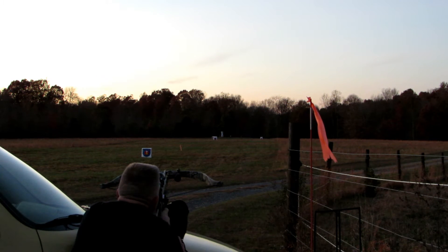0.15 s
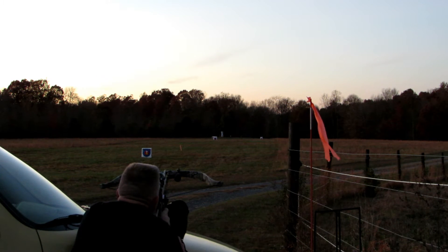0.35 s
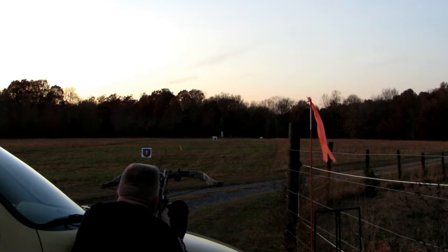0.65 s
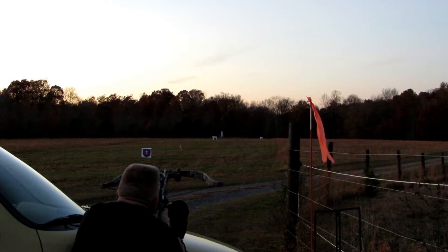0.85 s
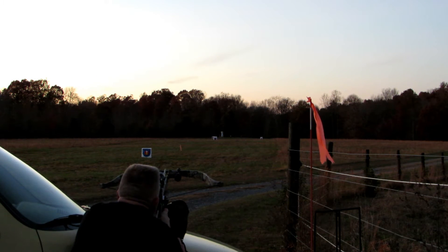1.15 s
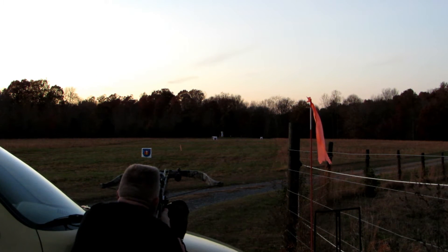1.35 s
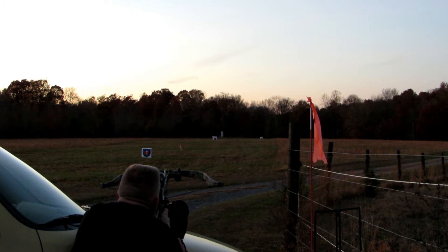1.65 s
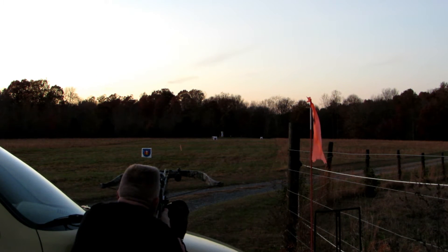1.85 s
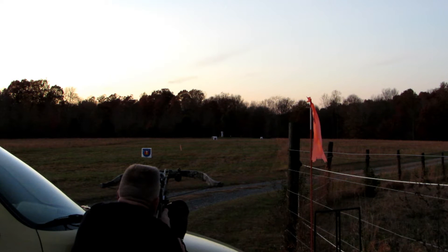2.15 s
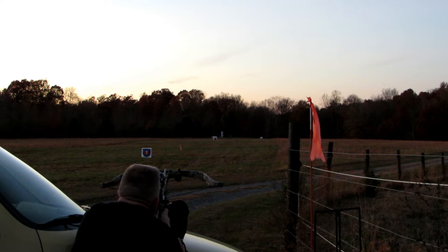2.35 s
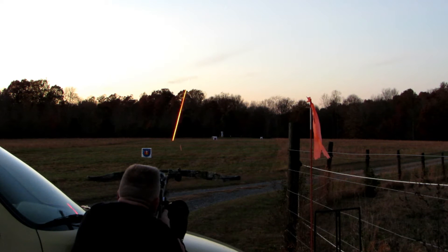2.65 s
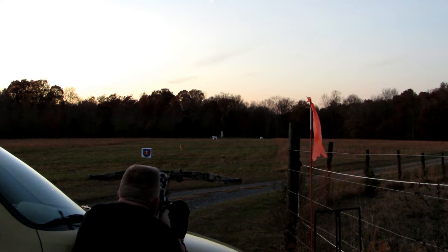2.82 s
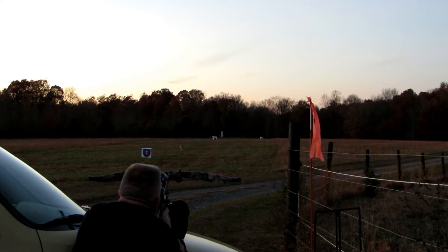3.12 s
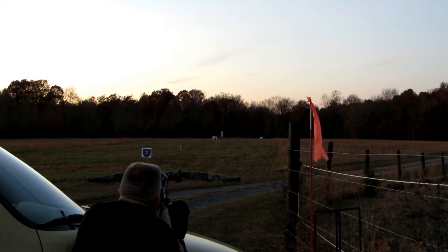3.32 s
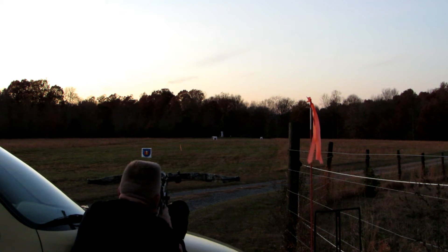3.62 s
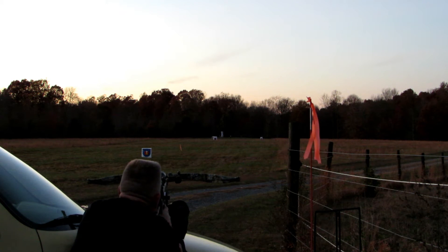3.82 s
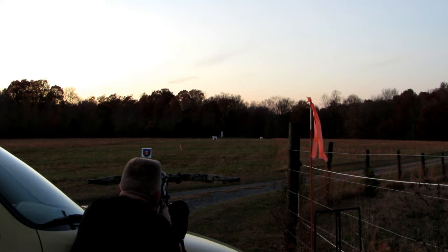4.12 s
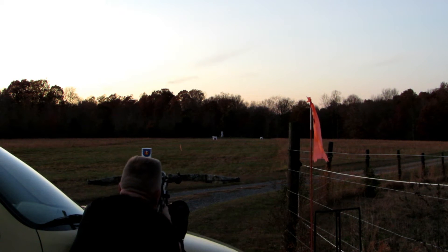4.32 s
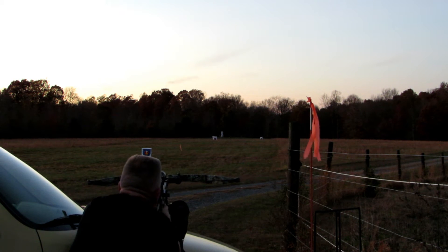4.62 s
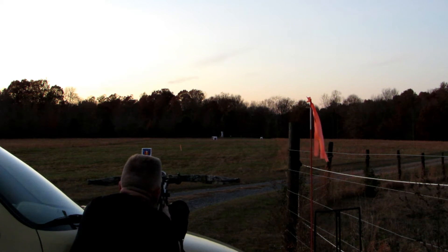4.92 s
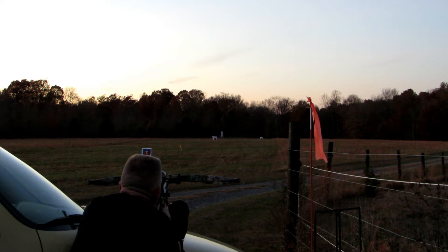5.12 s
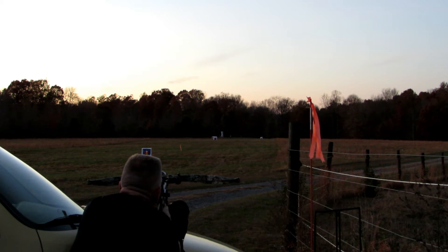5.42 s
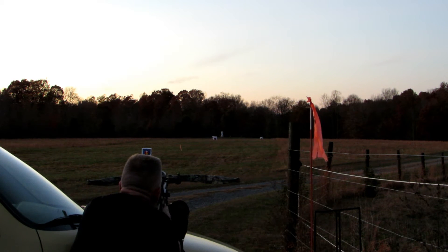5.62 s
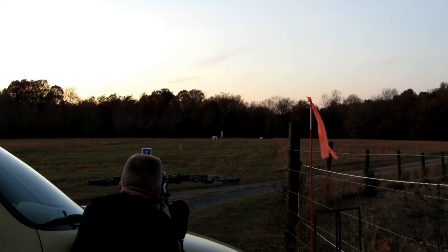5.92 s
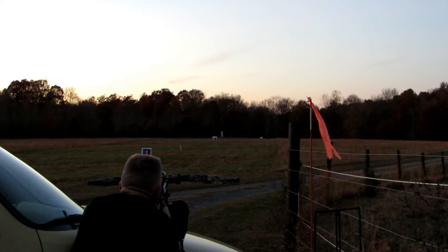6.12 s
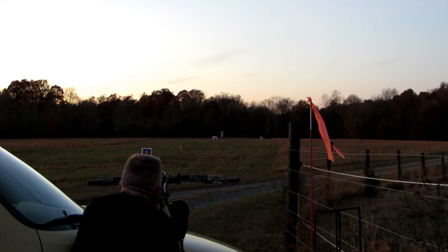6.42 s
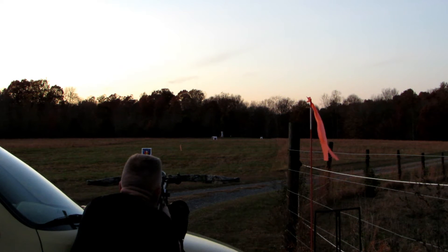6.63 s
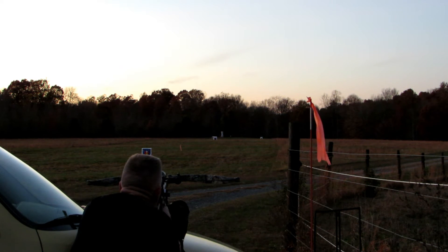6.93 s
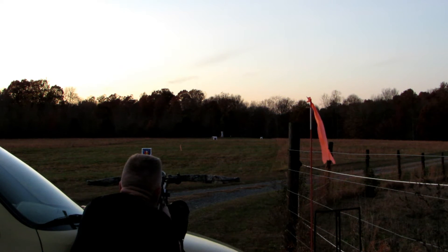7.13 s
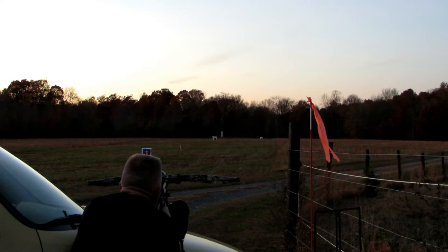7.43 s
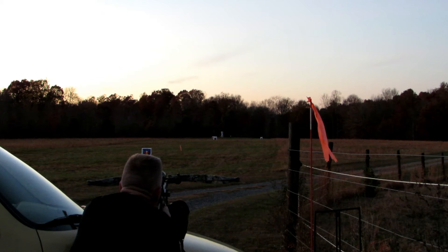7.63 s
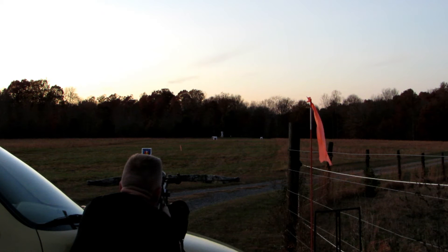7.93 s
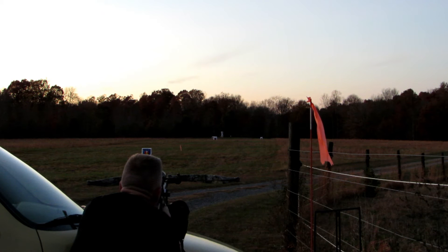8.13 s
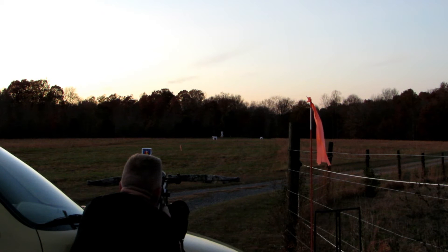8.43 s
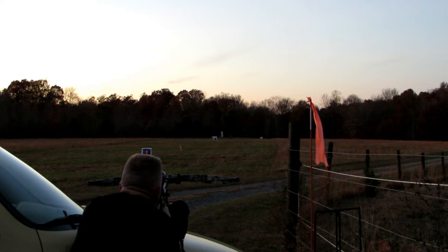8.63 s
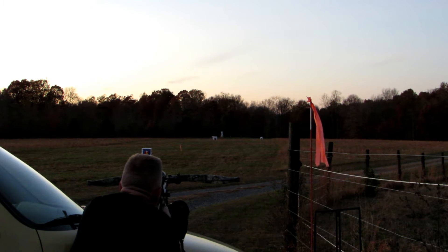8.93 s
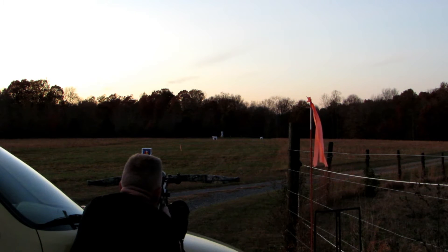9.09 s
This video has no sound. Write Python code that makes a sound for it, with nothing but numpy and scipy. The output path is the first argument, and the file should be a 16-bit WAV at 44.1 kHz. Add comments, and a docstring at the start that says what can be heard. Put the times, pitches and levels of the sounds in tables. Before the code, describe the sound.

A small camera microphone hears a quiet open field with distant traffic and steady hiss. Two soft, far gunshots roll through the trees. A few steps away, a crossbow snaps very loudly, clacking and briefly ringing. The automatic level ducks, then creeps back up. Four more distant shots with long woodland echoes follow, then one dry, dull tick across the field.

```python
"""At the edge of a field, traffic noise, light air and a camera's hiss and thin rising whine are heard throughout.
A vehicle soon passes far off, then a distant gun fires twice, each report rolling back from the woods as echoes.
A crossbow is shot a few steps away: noise bursts clack and rattle, decaying tones ring, and grass and fence
scatter the snap. The camera's gain control ducks at the snap and slowly recovers.
The gun fires four more times, and at the end one dull knock comes from across the field."""
import sys
import numpy as np
from scipy import signal
from scipy.fft import rfft, irfft
from scipy.io import wavfile
from scipy.ndimage import uniform_filter1d, minimum_filter1d

SR = 44100
rng = np.random.default_rng(int(sys.argv[2]) if len(sys.argv) > 2 else 0)


def wav_record(signal):
    """Record a signal, one row per channel, as 16-bit PCM in the file named by sys.argv[1]."""
    frames = np.transpose(np.atleast_2d(signal))
    bounded = np.clip(frames, -1, 1)
    # unit amplitude maps onto the largest positive 16-bit level
    quanta = np.round(bounded * 32767).astype(np.int16)
    wavfile.write(sys.argv[1], SR, quanta)


N = 408366
TIME = np.arange(N) / SR

# Banks and stands of trees: the front of each gives a hard echo, its depth gives scatter.
# Each row: delay in seconds, hard echo in dB, scatter in dB, scatter decay in seconds (levels are relative).
STANDS = [(.005, -10, 5.5, .012), (.026, -9, 2, 0.021), (.072, -17, -3, 0.035), (.106, -5, 0, 0.12),
          (.126, -4, 1.5, 0.019), (.176, -7.5, 0, .04), (.219, -10, 0.5, .075), (.262, -9, 0, 0.11)]
FOREST_DELAY_S = 0.11  # the deep woods answer from the tree line on
RAGGED_EDGE_S = 0.0019  # ragged edges make scatter take a moment to build up


def undb(db):
    """Turn decibels into a gain."""
    return 10 ** (np.asarray(db) / 20)


def die_away(t, t60):
    """Fade that falls by 60 dB in t60 seconds."""
    return np.exp(-np.log(1000) * t / t60)


def click(points):
    """The sharpest pulse, with nothing before its start, that has the tone colour of (Hz, dB) points; unit energy."""
    size = 4096
    hz, db = np.transpose(points)
    bin_hz = np.arange(size // 2 + 1) * SR / size
    log_gain = np.log(undb(np.interp(np.log(bin_hz + 1), np.log(hz), db)))
    # keeping only the forward half of the cepstrum packs the energy at the start (minimum phase)
    cepstrum = irfft(log_gain)[:size // 2]
    cepstrum[0] = 0
    pulse = irfft(np.exp(rfft(2 * cepstrum, size)))
    return pulse / np.linalg.norm(pulse)


def through(x, response):
    """Pass a sound through an impulse response (convolution)."""
    return signal.fftconvolve(np.atleast_2d(x), np.atleast_2d(response), axes=1)[:, :N]


def noise(side_db, size=N):
    """Stereo white noise whose side part (left against right) is side_db relative to the middle."""
    middle, side = rng.standard_normal((2, size))
    side = side * undb(side_db)
    return np.array([middle + side, middle - side]) / np.sqrt(1 + undb(side_db) ** 2)


def add(out, s, x):
    """Mix x into out from s seconds on."""
    start = int(s * SR)
    x = x[..., :N - start]
    out[:, start:start + x.shape[-1]] += x


def pan(db):
    """Gains of the two channels that make the left db louder than the right."""
    return undb(np.array([[db], [-db]]) / 2)


def tail(delay, decay):
    """Power of scatter that starts after delay; its amplitude builds up, then dies with time constant decay."""
    age = np.maximum(TIME - delay, 0)
    build_up = 1 - np.exp(-age / RAGGED_EDGE_S)
    return (build_up * np.exp(-age / decay)) ** 2


def camera(middle_db=-55.0, side_db=-48.0, whine_db=-71):
    """Wide microphone hiss from shaped noise, and a thin, slightly unsteady whine that slowly rises."""
    # Hiss of the stereo microphone, with a strong side part in the bass.
    # Each row: frequency in Hz, colour of the middle in dB, colour of the side in dB.
    hiss_colour = [(20, -3, 10.5), (120.3, -2.5, 13), (450, -0.5, 17.5), (900, 5, 15), (1800, 3, 8),
                   (3330, 0.5, 3.5), (5000, -1.5, -0.5), (7600, -3, -1.5), (8200, -5.5, -4),
                   (11100, -8.5, -8.5), (13200, -13, -13.5), (14300, -22, -19.5), (15000, -53, -46)]
    hz, middle_shape, side_shape = np.transpose(hiss_colour)
    middle = undb(middle_db) * through(rng.standard_normal(N), click(np.c_[hz, middle_shape]))
    side = undb(side_db) * through(rng.standard_normal(N), click(np.c_[hz, side_shape]))
    hiss = np.vstack([middle + side, middle - side])

    whine_hz, rise_hz_per_s = 5710, 28.2
    jitter = 300 * uniform_filter1d(rng.standard_normal(N), size=400)  # about 15 Hz either way
    pitch = whine_hz + rise_hz_per_s * TIME + jitter
    whine = np.sqrt(2) * np.sin(2 * np.pi * np.cumsum(pitch) / SR)
    return hiss + undb(whine_db) * whine


def road(traffic_db=-52.0, swell_db=1, side_db=-9):
    """Distant traffic as shaped noise whose level swells gently at random."""
    # Each row: frequency in Hz, colour of the traffic in dB.
    traffic_colour = [(20, -16), (85, -3), (150, -10.5), (260, -19), (400, -2.5), (530, 3), (660, 0.5),
                      (950, -3.5), (1500, -18), (3000, -41)]
    swell = np.interp(TIME, np.linspace(0, TIME[-1], 30), rng.standard_normal(30))
    return through(noise(side_db), click(traffic_colour)) * undb(traffic_db + swell_db * swell)


def tyres(level_db=-55, pass_s=0.34, pass_length_s=0.16, pass_db=3.5, side_db=-9):
    """Noise through resonances makes tyres sing steadily, and louder while one vehicle goes by."""
    # Each row: frequency in Hz, width in Hz, relative level in dB.
    tyre_tones = [(538, 29, 0.5), (620, 20, -12.5), (754, 15, -4.5)]
    t = TIME[:SR // 4]
    tread = np.zeros(len(t))
    for hz, width, db in tyre_tones:
        fade = np.exp(-np.pi * width * t)
        tread += undb(db) * np.sqrt(width) * fade * np.sin(2 * np.pi * hz * t)
    passing = np.exp(-((TIME - pass_s) / pass_length_s) ** 2)
    singing = through(noise(side_db), tread / np.linalg.norm(tread))
    return singing * undb(level_db + pass_db * passing)


def light_air(level_db=-66):
    """Low noise, mostly different on the two microphone ports, rumbles as air moves over them."""
    return undb(level_db) * through(noise(side_db=5.0), click([(20, -2.5), (80, 3), (200, -13.5), (1000, -49.5)]))


def background():
    """The far road, a little to the right, and light air at the microphone."""
    return (road() + tyres()) * pan(db=-1.5) + light_air()


def far_knock(at_s=8.0662, level_db=-9.5):
    """One dry, dull tick from across the field, a single shaped pulse."""
    # Each row: frequency in Hz, colour of the knock in dB.
    knock_colour = [(30, -26), (130, -6), (260, -21), (800, 4.5), (1400, -11), (2100, 1), (2450, -12),
                    (2900, -38), (8000, -59)]
    out = np.zeros((2, N))
    add(out, at_s, undb(level_db) * click(knock_colour))
    return out


def woods_strength(forest_db=-4, forest_t60_s=5.24):
    """How strongly the land answers at each delay: scatter of the stands on top of the forest's long roll."""
    power = undb(forest_db) ** 2 * tail(FOREST_DELAY_S, forest_t60_s / np.log(1000))
    for delay, _, scatter_db, decay in STANDS:
        power = power + undb(scatter_db) ** 2 * tail(delay, decay)
    return np.sqrt(power)


def woods_echoes(count, echo_db=-32.0, slap_db=-3, flutter_db=1, patchy_db=1.6, dulling_s=.7, stirred=0.57,
                 side_db=-16, trunks_per_s=60, trunk_db=19):
    """One rolling echo for each shot: countless trunks answer, duller the further the sound has travelled."""
    # Each row: frequency in Hz, colour of early echoes in dB, colour of late echoes in dB.
    woods_colour = [(30, -25, -37), (110, -17.5, -21.5), (230, -25.5, -33.5), (364, -11, -18.5),
                    (680, -2.5, 2.5), (1014, 2, 5), (1436, -4, -9.5), (1950, -14.5, -27.5),
                    (3250, -25.5, -40), (4240, -37.5, -58.5), (9000, -74, -76.5)]
    hz, early_db, late_db = np.transpose(woods_colour)
    early, late = click(np.c_[hz, early_db]), click(np.c_[hz, late_db])
    size = SR * 7 // 2
    t = TIME[:size]
    near_share = np.exp(-t / dulling_s)

    # clumps of trees answer unevenly, and alike for every shot
    clumps = np.interp(t, np.arange(size // 256) * 256 / SR, rng.standard_normal(size // 256))
    strength = woods_strength()[:size] * undb(patchy_db * clumps + echo_db)
    # single thick trunks stand out of the scatter, mostly the near ones
    trunk_here = (t > FOREST_DELAY_S) * (rng.random(size) < trunks_per_s / SR)
    thick = undb(trunk_db) * near_share * trunk_here

    still = noise(side_db, size=size)
    echoes = []
    for _ in range(count):
        # moving air changes a share of the paths from shot to shot
        changed = noise(side_db, size=size)
        paths = np.sqrt(1 - stirred) * still + np.sqrt(stirred) * changed
        trunks = (paths + thick) * strength
        echo = through(trunks * near_share, early) + through(trunks * (1 - near_share), late)
        for delay, hard_db, _, _ in STANDS:
            flutter = flutter_db * rng.standard_normal()
            add(echo, delay, undb(slap_db + hard_db + flutter) * early)
        echoes.append(echo)
    return echoes


def gunshots(report_db=-2, ground_lag=0.00076, ground_db=1, thump_db=-9, thump_lag=0.0019, edge_lag=.0685,
             pan_db=-1.5):
    """Each shot is a crack, its bounce off the ground and a low thump; field edge and woods answer."""
    # Each row: start in seconds, report in dB, rolling echo in dB, hard echo from the field edge in dB.
    # The report and rolling echo levels are relative; report_db, thump_db and echo_db are added to them.
    shots = [(0.7147, -2.5, -1, -13.5), (1.4784, -3, -1, -16), (3.0513, -2, -1.5, -8.5),
             (4.4140, -3, -2, -13.5), (6.2252, -3, -1, -14), (7.25, -4, -0.5, -5)]
    # Colours of the crack, the thump and the field edge's echo. Each row: frequency in Hz, level in dB.
    report_colour = [(30, -38), (200, -14.5), (520, -0.5), (800, 8.5), (1100, 1.5), (1600, 3.5), (2000, -5),
                     (2700, -13.5), (3400, -11), (4100, -41), (9000, -67)]
    thump_colour = [(20, -15), (50, -3.5), (90, 5), (150, -2), (240, -40), (700, -54)]
    edge_colour = [(100, -37), (950, -18), (1350, 10), (1750, -20), (2800, -10.5), (4000, -55), (9000, -72)]
    crack = click(report_colour)
    thump = click(thump_colour)
    edge_echo = click(edge_colour)

    out = np.zeros((2, N))
    for (s, db, woods_db, edge_db), echo in zip(shots, woods_echoes(count=len(shots))):
        add(out, s, undb(db + report_db) * crack)
        add(out, s + ground_lag, undb(db + report_db + ground_db) * crack)
        add(out, s + thump_lag, undb(db + thump_db) * thump)
        add(out, s + edge_lag, undb(edge_db) * edge_echo)
        add(out, s, undb(woods_db) * echo)
    return out * pan(pan_db)


def fence_and_field(x, wet_db=-30, side_db=-5, grass_t60_s=.85, fence_delay_s=.078, fence_db=7, fence_decay_s=.026):
    """Posts, car and grass scatter a faint copy: grass at once, fading evenly, the fence a moment later."""
    # Each row: frequency in Hz, colour of the scatter in dB.
    near_colour = [(60, -10), (300, -5), (1000, -1.5), (2800, -1.5), (3250, 5.5), (3800, -2), (6000, 2),
                   (14000, -7.5)]
    grass = tail(0, grass_t60_s / np.log(1000))
    fence = undb(fence_db) ** 2 * tail(fence_delay_s, fence_decay_s)
    scatter = (noise(side_db) * np.sqrt(grass + fence))[:, :SR * 3 // 4]
    response = through(scatter / np.linalg.norm(scatter[0]), click(near_colour))
    return undb(wet_db) * through(x, response)


def clack(blows, clack_db=31, rattle_db=-6, rattle_t60=.08, side_db=-14):
    """Each blow is a short harsh burst of noise as parts touch, and a longer, softer rattle."""
    # Each row: frequency in Hz, colour of a contact in dB.
    clack_colour = [(30, -30), (200, -18), (400, -2), (680, -5), (920, -10.5), (1500, 0), (2300, 0),
                    (4300, -4), (6500, -10.5), (10000, -10.5), (12600, -6.5), (14300, -17.5)]
    t = TIME[:SR // 2]
    high_pass = signal.butter(1, 7000, "high", fs=SR, output="sos")
    contacts = np.zeros((2, N))
    for s, db, decay, treble_db in blows:
        contact = noise(side_db, size=len(t)) * np.exp(-t / decay)
        rattle = noise(side_db, size=len(t)) * die_away(t, rattle_t60)
        contact = contact / np.linalg.norm(contact[0])
        rattle = rattle / np.linalg.norm(rattle[0])
        blow = contact + undb(rattle_db) * rattle
        treble = signal.sosfilt(high_pass, blow)
        add(contacts, s, undb(db) * (blow + (undb(treble_db) - 1) * treble))
    return undb(clack_db) * through(contacts, click(clack_colour))


def limbs_and_stock(release_s, recoil_db=21, ring_db=0, swell_s=0.0047):
    """Limbs, string and rail ring as decaying tones; the stock kicks back as the limbs fly forward."""
    # Each row: frequency in Hz, level in dB, time to fade by 60 dB in seconds.
    bow_modes = [(226, -34, .5), (316, -4, .08), (409, -22, .26), (530, -9, .06), (635, -6, .1),
                 (740, -7, .07), (1262, -23, .3), (1453, -9, .1), (1570, -3, .08), (1960, -15, .15),
                 (2080, -5, .08), (2152, -13, .25), (2240, -2, .075), (2330, -2, .07), (2579, -4, .085),
                 (2750, -4, .08), (3050, -5, .09), (3257, -1, .11), (3460, -5, .08), (4150, -7, .09),
                 (4385, -4, .09), (4522, -3, .09), (5750, -10, .11), (7700, -10, .09), (8250, -12, .08),
                 (9240, -12, .09), (10920, -11, .07), (12150, -4, .06), (13000, -7, .055)]
    # Each row: frequency in Hz, colour of the kick in dB.
    recoil_colour = [(20, -16.5), (70, -7.5), (130, -4.5), (220, -9.5), (450, 2), (700, -9.5), (1500, -37),
                     (6000, -67)]
    t = TIME[:SR // 2]
    swing = np.zeros(len(t))
    for hz, db, t60 in bow_modes:
        swing += undb(db) * die_away(t, t60) * np.sin(2 * np.pi * (hz * t + rng.random()))
    # the tones take up their energy while the string runs down the rail
    build_up = 1 - np.exp(-t / swell_s)
    body = np.zeros((2, N))
    add(body, release_s, undb(ring_db) * swing * build_up)
    add(body, release_s, undb(recoil_db) * click(recoil_colour))
    return body


def crossbow():
    """The stock kicks, the parts clack and rattle, and the limbs ring from the moment of release."""
    # Latch, string stop and rebounds. Each row: start in seconds, relative level in dB,
    # contact decay in seconds, change of the treble above about 7 kHz in dB.
    blows = [(2.7393, -8, 0.0017, 5), (2.7406, 0.5, 0.0027, -5), (2.7456, -4.5, 0.00098, 1.5),
             (2.7509, -11.5, 0.0018, -1), (2.7562, -11.5, .003, -4), (2.7603, -9.5, 0.0023, -5.5),
             (2.776, -27.5, .004, -3)]
    return clack(blows) + limbs_and_stock(release_s=blows[0][0])


def scene():
    """The near snap and the far shots over the quiet field."""
    snap = crossbow()
    left, right = gunshots() + background()
    # these sounds come from a little to the right and reach the left port a sample later
    far = np.array([np.r_[0, left[:-1]], right])
    return snap + fence_and_field(snap) + far + far_knock() + camera()


def gain_control(x, limit_db=-8.5, hold_s=0.39, release_s=0.51):
    """Whatever exceeds the limit turns the gain down at once; it is held, then creeps back."""
    power = uniform_filter1d(np.mean(x ** 2, axis=0), size=SR // 125)  # averaged over 8 ms
    excess = np.maximum(10 * np.log10(np.maximum(power, 1e-12)) - limit_db, 0)
    fade = np.exp(-TIME / release_s)
    released = np.maximum.accumulate(excess / fade) * fade
    # the largest value within the hold time before each moment
    half_hold = int(hold_s * SR) // 2
    held = -minimum_filter1d(-released, size=2 * half_hold + 1, origin=half_hold)
    return x * undb(-held)


def record(dry):
    """The camera notches out two tones, rides the gain, clips at full scale and cuts the top."""
    # Each entry: frequency of a narrow notch in Hz.
    notch_hz = [3930, 7860]
    for hz in notch_hz:
        b, a = signal.iirnotch(hz, hz / 190, fs=SR)  # 190 Hz wide
        dry = signal.lfilter(b, a, dry)
    loud = np.clip(gain_control(dry), -1, 1)
    top_cut = signal.ellip(8, .2, 70, 15300, fs=SR, output="sos")  # low-pass at 15300 Hz
    return signal.sosfilt(top_cut, loud)


dry = scene()
out = record(dry)
wav_record(out)
```